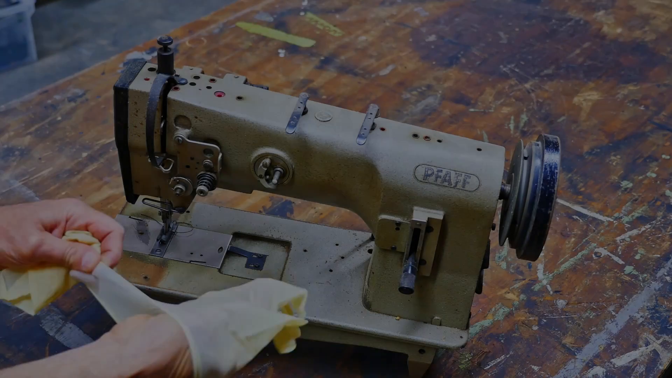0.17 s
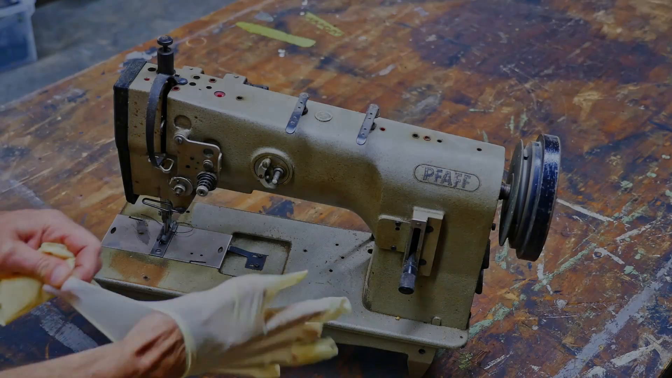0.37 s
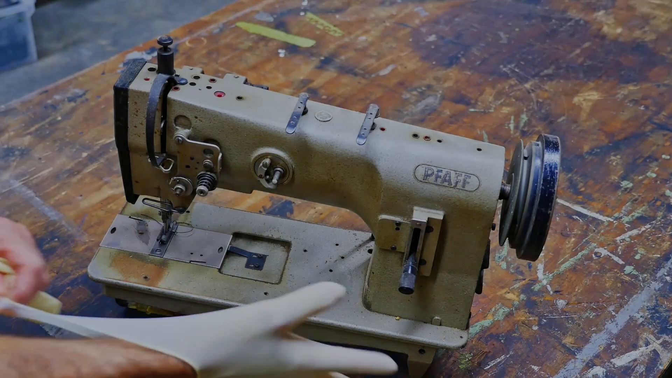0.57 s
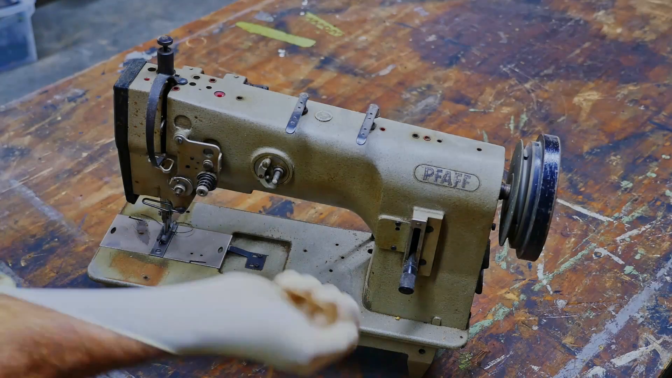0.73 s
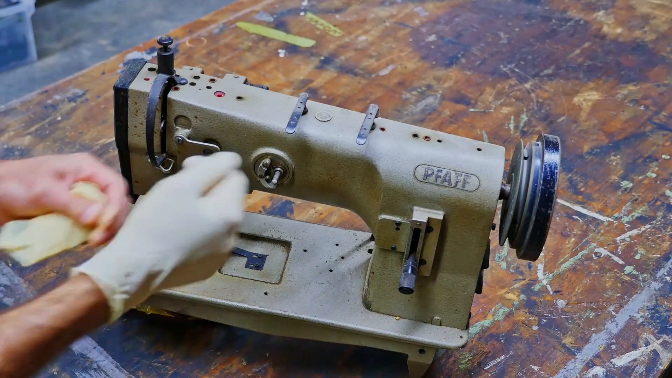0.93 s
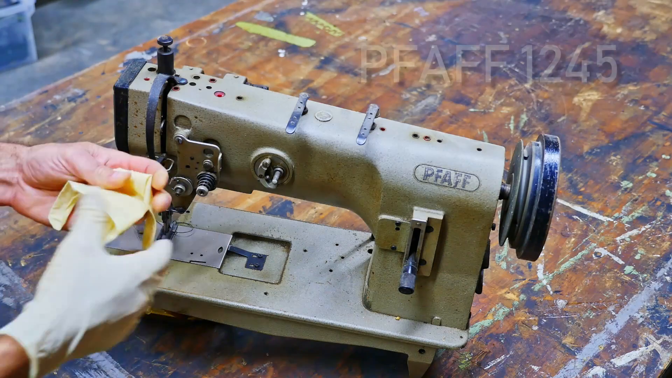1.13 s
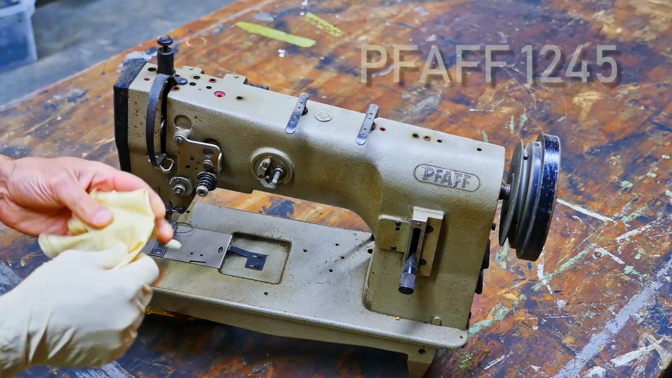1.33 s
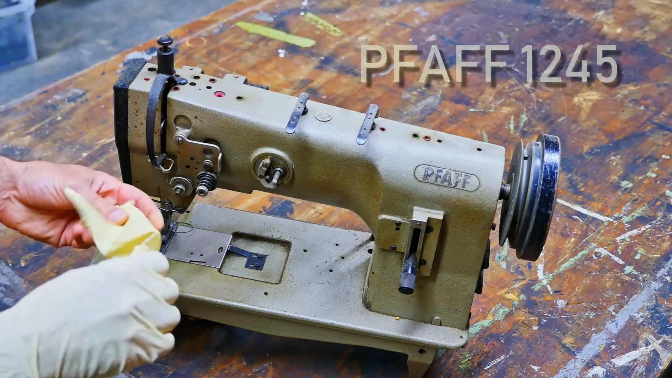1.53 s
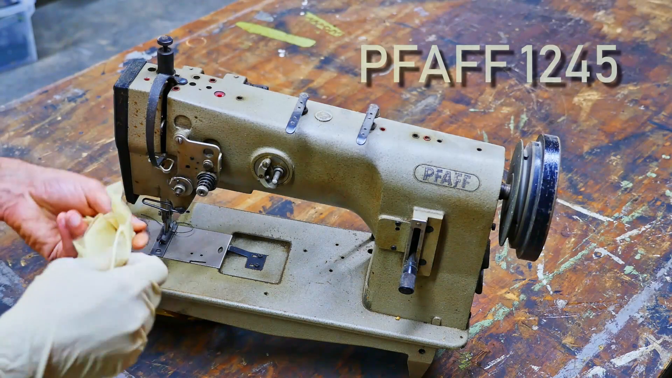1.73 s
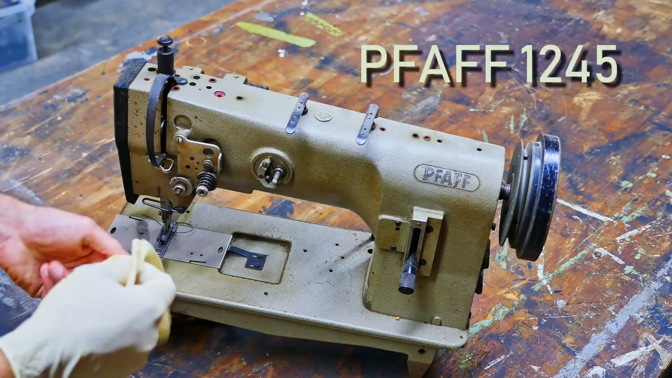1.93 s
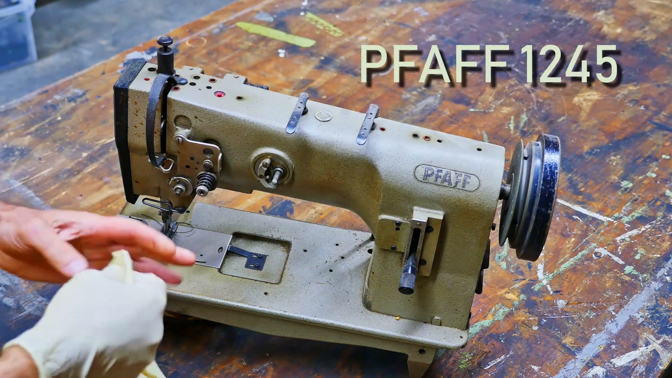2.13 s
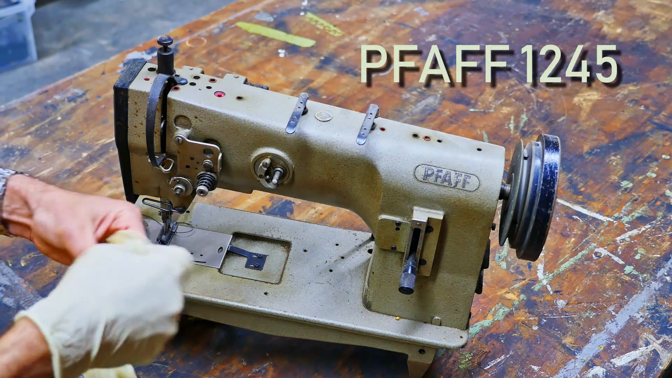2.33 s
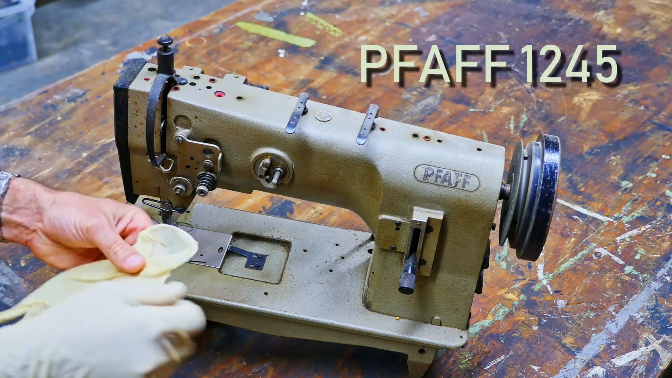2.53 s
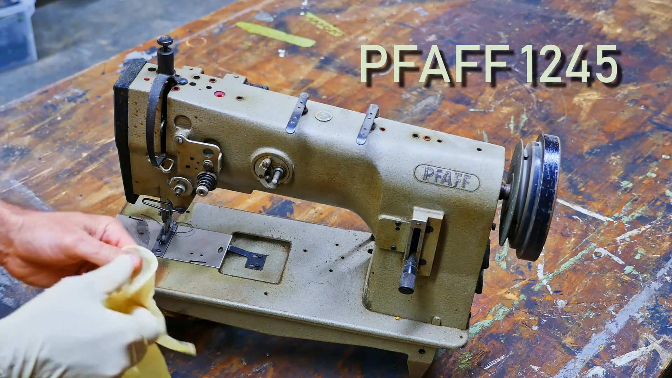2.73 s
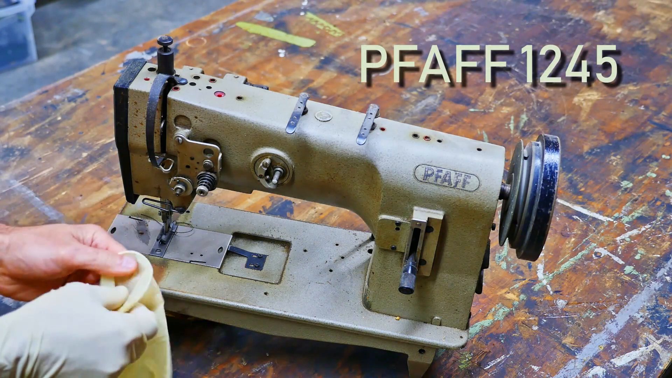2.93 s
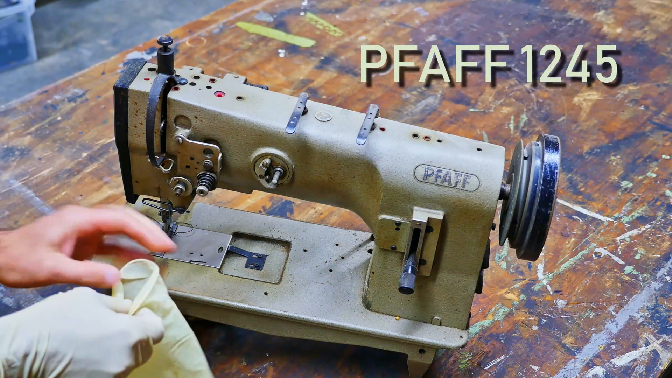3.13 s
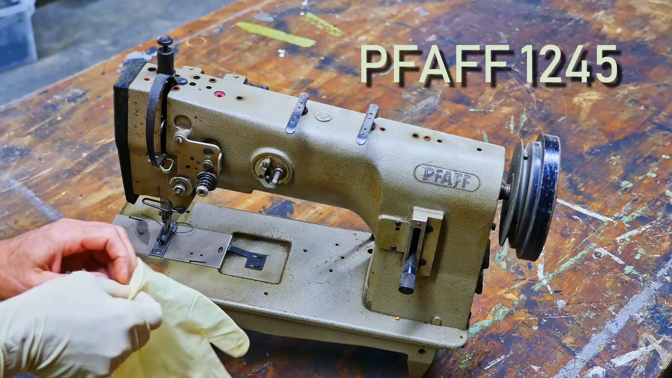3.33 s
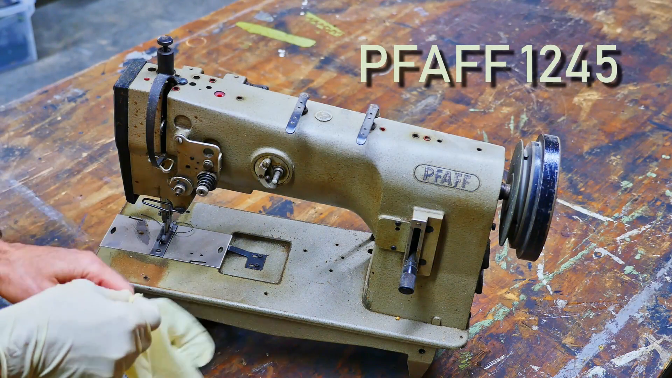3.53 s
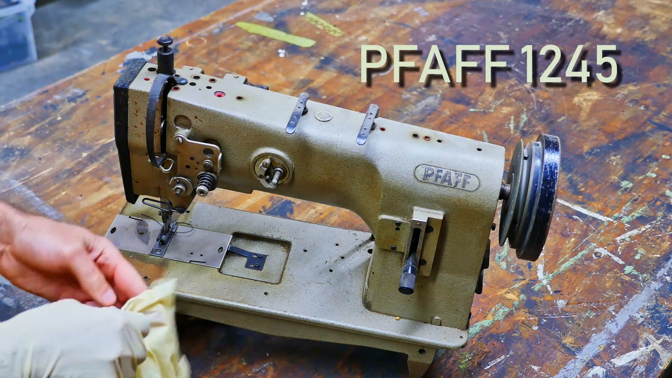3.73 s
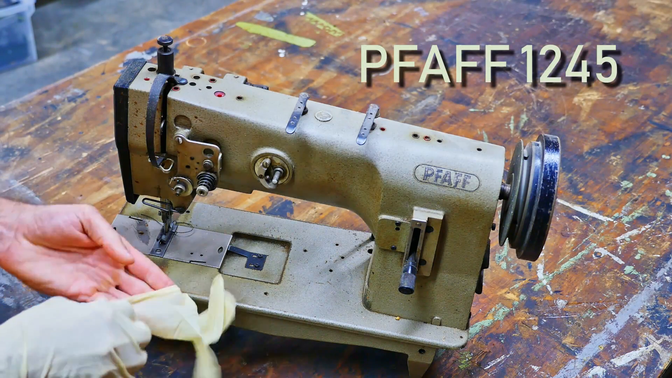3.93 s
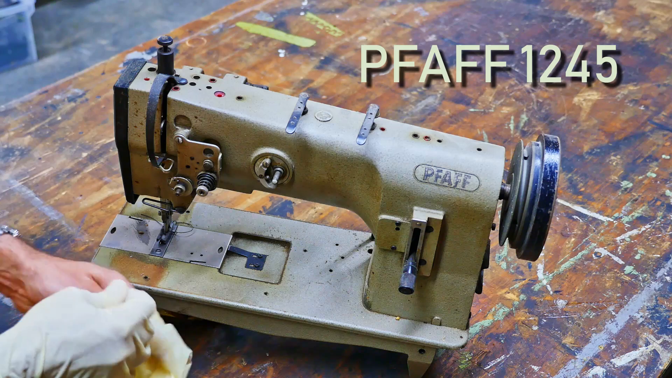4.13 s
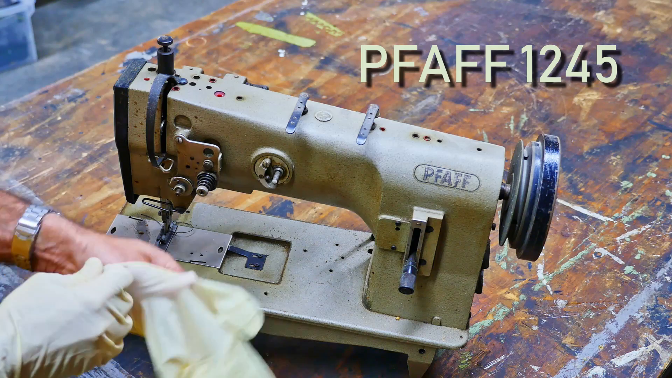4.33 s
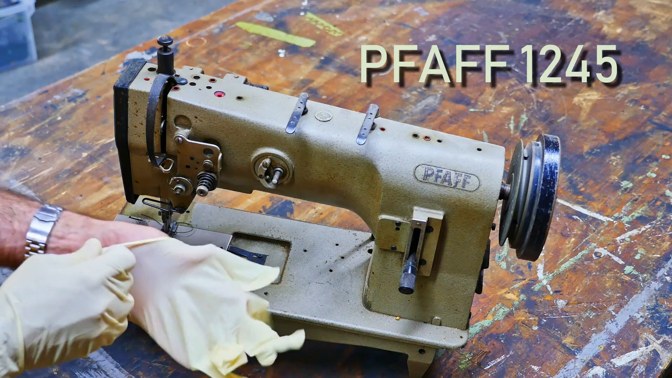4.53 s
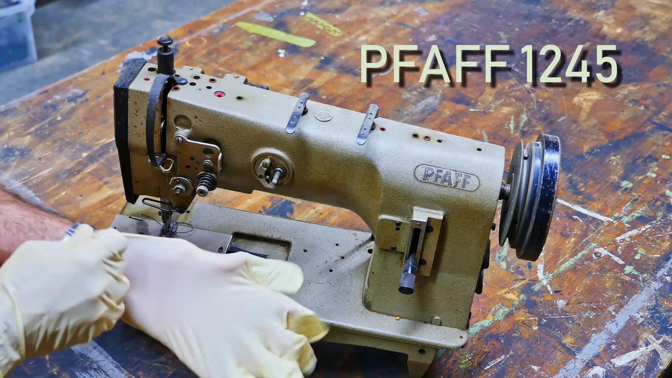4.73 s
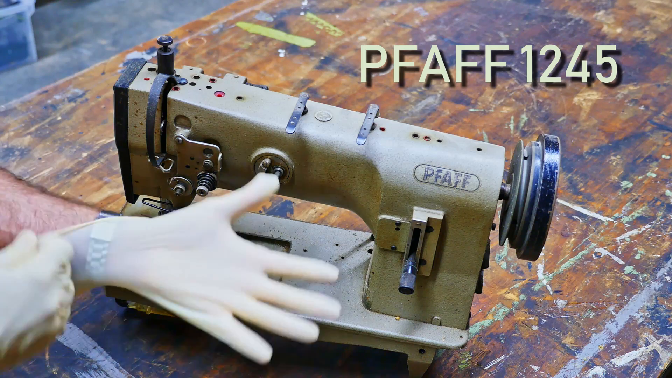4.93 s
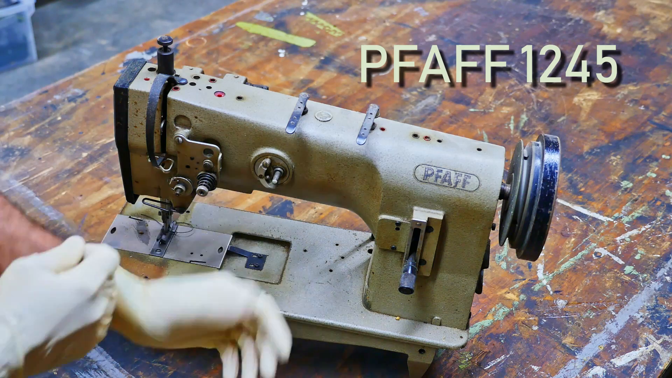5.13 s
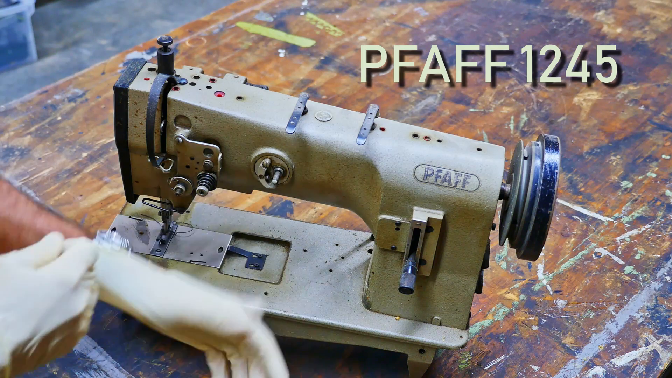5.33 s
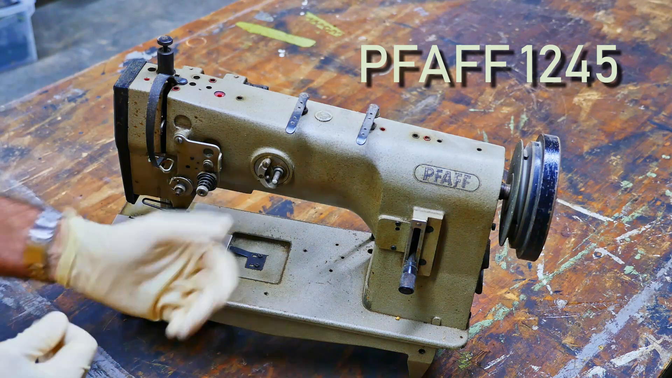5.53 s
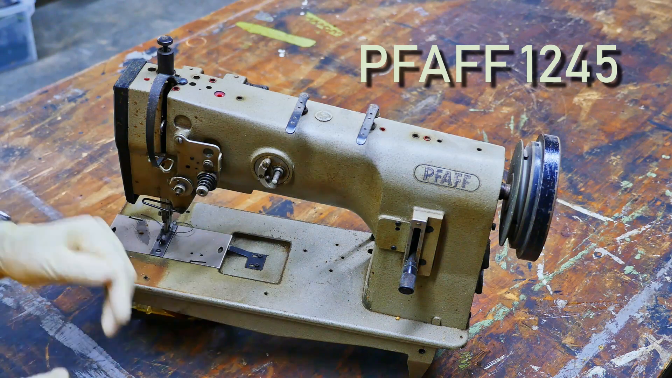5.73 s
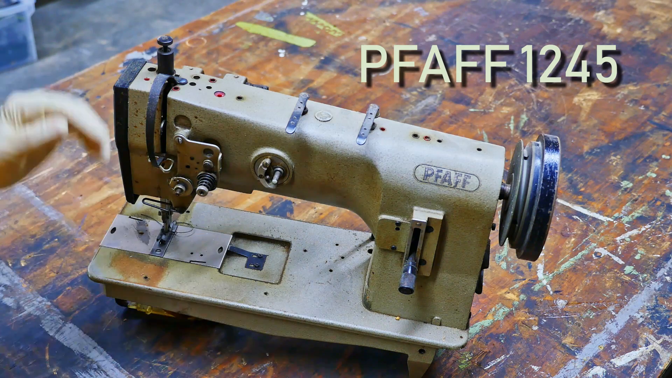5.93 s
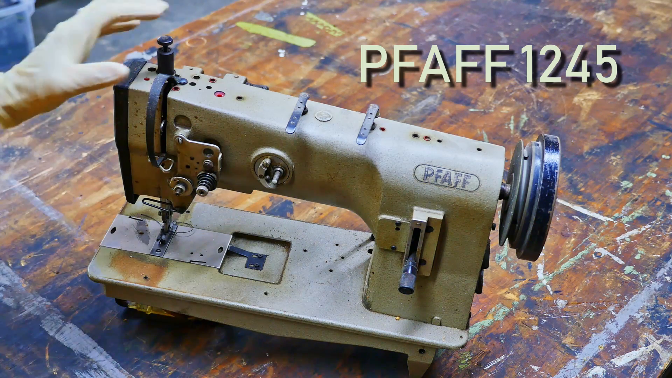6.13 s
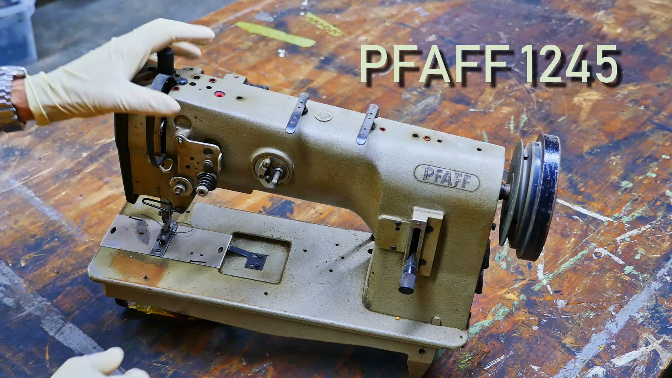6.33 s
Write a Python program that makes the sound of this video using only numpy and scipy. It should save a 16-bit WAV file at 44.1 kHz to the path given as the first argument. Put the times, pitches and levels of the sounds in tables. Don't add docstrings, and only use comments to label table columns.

```python
import sys
import numpy as np
from scipy import signal
from scipy.fft import rfft, irfft
from scipy.io import wavfile

SR = 44100
rng = np.random.default_rng(int(sys.argv[2]) if len(sys.argv) > 2 else 0)


def invert_db(x):
    u = np.asarray(x, float) / 20
    return 10 ** u


def output_pcm(signal):
    pcm = np.clip(np.atleast_2d(signal).T, -1, 1) * 32767
    wavfile.write(sys.argv[1], SR, np.round(pcm).astype(np.int16))


N = 284886


def rms_one(x):
    return x / np.sqrt(np.mean(x ** 2) + 1e-20)


def in_time(rows):
    s, *columns = np.transpose(rows)
    return [np.interp(np.arange(N) / SR, s, c) for c in columns]


def at_hz(points, hz):
    curve_hz, value = np.transpose(points)
    return np.interp(np.log(hz), np.log(curve_hz), value)


def drift(rate):
    knots = rng.standard_normal(N // 64 + 600)
    r = np.exp(-128 * np.pi * rate / SR)
    slow = signal.lfilter([1], [1, -2 * r, r * r], knots)[500:]
    return np.interp(np.arange(N) / 64, np.arange(len(slow)), rms_one(slow))


def resonate(x, hz, width_hz):
    r = np.exp(-np.pi * width_hz / SR)
    feed = np.array([1, 0, -1]) * (1 - r * r) / 2
    return signal.lfilter(feed, [1, -2 * r * np.cos(2 * np.pi * hz / SR), r * r], x)


def colour(x, spectrum):
    hz = np.maximum(np.fft.rfftfreq(x.shape[-1], 1 / SR), 1)
    (low_hz, low_db), (high_hz, high_db) = spectrum[0], spectrum[-1]
    ends = [(low_hz / 2, low_db - 40)] + list(spectrum) + [(high_hz * 2, high_db - 40)]
    return irfft(rfft(x) * invert_db(at_hz(ends, hz)), x.shape[-1])


def two_ports(mid, side, likeness):
    hz = np.maximum(np.fft.rfftfreq(N, 1 / SR), 1)
    alike = np.clip(at_hz(likeness, hz), -.95, .99)
    shared = rfft(mid) * np.sqrt((1 + alike) / 2)
    apart = rfft(side) * np.sqrt((1 - alike) / 2)
    return irfft(np.array([shared + apart, shared - apart]), N) * np.sqrt(2)


def workshop_air():
    # frequency in Hz, level in dB per Hz.
    air_spectrum = [(15, -69), (25, -15), (113, 4.5), (169, 2), (297, 4), (399, -7), (614, 4.5),
                    (970, -5.5), (1850, -9), (3630, -14), (5430, -24), (9810, -25), (14600, -25.5),
                    (15500, -66)]
    # frequency in Hz, width in Hz, level in dB rms.
    hum_tones = [
        (240, 12, -68),
        (297, 9, -63.5),
        (366, 15, -73),
    ]
    # frequency in Hz, left-right likeness from -1 to 1.
    air_likeness = [(60, -0.53), (240, 0.13), (950, -0.79), (3770, -0.46), (15000, -0.062)]
    air = rms_one(colour(rng.standard_normal((2, N)), air_spectrum))
    air *= invert_db(-59 + 0.7 * drift(1.0))
    hum = np.zeros((2, N))
    for hz, width_hz, db in hum_tones:
        tone = resonate(rng.standard_normal((2, N)), hz, width_hz)
        hum += invert_db(db) * rms_one(resonate(tone, hz, width_hz))
    return two_ports(*(air + hum), air_likeness)


def room(x):
    # frequency in Hz, time to fall 60 dB in seconds.
    decay_time = [(100, 1), (500, 0.55), (2200, 0.57), (5500, 0.47), (12000, 0.37)]
    t = np.arange(SR) / SR
    tail = np.zeros((2, SR))
    for low in 70 * 2. ** np.arange(8):
        octave = signal.butter(2, [low, 2 * low], "band", fs=SR, output="sos")
        band = signal.sosfilt(octave, rng.standard_normal((2, SR)))
        tail += band * invert_db(-60 * t / at_hz(decay_time, low * np.sqrt(2)))
    tail *= 1 - np.exp(-t / 0.00067)
    tail /= np.sqrt(np.sum(tail ** 2) / 2)
    return signal.fftconvolve(x[None], tail, axes=1)[:, :N]


def grains(per_s, spread_db, clump_db, clump_rate):
    born = rng.random(N) < per_s / SR
    uneven_db = spread_db * np.minimum(rng.exponential(1, N), 5)
    sizes = invert_db(uneven_db + clump_db * drift(clump_rate))
    return born * sizes * rng.standard_normal((2, N))


def strokes():
    # peak time in seconds, peak level in dB, length in seconds, then stretched ring
    # and trapped air flutter, both in dB over the hiss.
    stroke_rows = [(0.382, -57, 0.074, 13, 9), (0.495, -38, 0.11, -5.5, -4.5), (0.66, -34.5, 0.1, 2, -14),
                   (0.706, -36, 0.1, 3.5, -20), (0.808, -37, 0.042, -13, -10),
                   (0.884, -28.5, 0.031, -13, -13), (0.978, -38.5, .06, -29, -4.5),
                   (1.321, -48, 0.17, -5.5, -12.5), (1.776, -61, 0.43, -22, -14),
                   (2.379, -51.5, 0.16, -2.5, -22), (2.743, -55, 0.21, -21, -13),
                   (2.903, -55, 0.11, -23, -13), (3.066, -54.5, 0.22, -5, -6),
                   (3.368, -57.5, 0.15, -5, -19), (3.58, -51.5, 0.13, -8, -20), (3.83, -50, 0.21, -4, -12),
                   (4.895, -30.5, 0.13, -1.5, -12), (4.977, -47.5, 0.28, -23, -4),
                   (5.234, -35, 0.11, -11, -7.5), (5.411, -34, 0.1, -6.5, -9),
                   (5.515, -31, 0.14, -4.5, -10.5), (5.643, -43, 0.22, 3.5, 2),
                   (6.105, -58.5, 0.21, -26, -9), (6.46, -52.5, 0.3, -15, -19)]
    rise_db, fall_db = 33, 24.5
    t = np.arange(N) / SR
    power = np.zeros((3, N))
    for s, peak_db, length, stretch_db, air_db in stroke_rows:
        away = (t - s) / max(length, .02)
        swell = invert_db(2 * (peak_db - np.maximum(-rise_db * away, fall_db * away)))
        power += invert_db(2 * np.array([[0], [stretch_db], [air_db]])) * swell
    return power


def rustle():
    # time in seconds, sliding effort in dB, stretched ring in dB over it.
    handling = [(0, -44, -4.5), (0.18, -46.5, -2), (0.26, -51.5, 2), (0.6, -43.5, -5), (0.95, -45.5, -3.5),
                (1.08, -54.5, -3.5), (1.24, -56.5, -4), (1.6, -50.5, -9), (2.12, -62.5, -2),
                (2.6, -60, -4.5), (3.28, -64, -1.5), (3.5, -57, -4), (3.8, -54.5, -7), (4.15, -50.5, -2.5),
                (4.5, -48.5, -3), (4.76, -48.5, 1), (5.13, -51, -2), (5.88, -65, 1), ]
    # frequency in Hz, level in dB per Hz.
    hiss_spectrum = [(1650, -13.5), (2800, -12), (4030, -9.5), (5300, 1.5), (5610, 2), (6330, -6),
                     (7310, -2), (8140, -8), (9940, -11), (12800, -28.5), (14600, -35), (15500, -62)]
    film_spectrum = [(600, -12.5), (900, -7.5), (1300, -2.5), (1900, -3.5), (2500, -4.5), (3200, -8),
                     (4200, -9.5)]
    flutter_spectrum = [(35, -80), (60, -22), (134, -5.5), (188, -8), (226, 1), (355, 1.5), (570, -5.5),
                        (1100, -8.5), (1430, -87), (2420, -120)]
    effort_db, stretch_db = in_time(handling)
    ring_db = effort_db + stretch_db
    steady = invert_db(2 * np.array([effort_db, ring_db, ring_db - 6]))
    rest = [[0], [0], [invert_db(2 * -68)]]
    hiss_gain, ring_gain, flap_gain = np.sqrt(steady + strokes() + rest)
    hiss = rms_one(colour(grains(14000, 0.31, 1.06, 25), hiss_spectrum)) * hiss_gain
    ring = rms_one(colour(grains(5000, 0.44, 0.78, 46), film_spectrum)) * ring_gain
    flap = rms_one(colour(grains(1500, 2.0, 2.0, 18), flutter_spectrum)) * flap_gain
    return hiss + ring + flap


def squeaks():
    # time in seconds, slips per second in Hz, level in dB,
    # roughness from 0 to 1.
    glides = [
        [(.545, 1520, -52, 0.29), (.565, 1563, -32, 0.14), (.575, 1596, -25, 0.02), (.581, 1565, -45, 0.2),
         (.592, 1590, -45, 0.2), (.618, 1650, -46, 0.2), (.625, 1590, -70, .3)],
        [(4.888, 1317, -55, 0.14), (4.897, 1351, -21, .08), (4.908, 1390, -22.5, 0), (4.914, 1384, -27, .6),
         (4.945, 1362, -36, 0.55), (5.0, 1355, -64, 0.7)],
        [(4.915, 1500, -40, 0.49), (4.93, 1567, -28.5, 0.54), (4.945, 1604, -29, 0.4), (4.955, 1614, -31, 1),
         (4.985, 1635, -49, 0.9)],
        [(4.878, 1306, -28, 0.49), (4.886, 1255, -38, 0), (4.9, 1253, -29, 0), (4.93, 1240, -48, 0.3)],
        [(.576, 1640, -57, 0), (.588, 2040, -37, 0.2), (.596, 1750, -60, .2)],
        [(.14, 1310, -62, 0.4), (.175, 1320, -40, 0), (.2, 1320, -56, 0.1), (.245, 1305, -51, 0),
         (.29, 1320, -78, 0.2)],
    ]
    orders = [
        [-9.5, -2.5, -13, -4.5],
        [-14, -3, -9, 0.5],
        [-5.5, -1.5, -5, -12],
        [1, -31, -23, -25],
        [-2, -4, -20, -25],
        [-3.5, -15, -25, -30],
    ]
    out = np.zeros(N)
    t = np.arange(N) / SR
    for rows, orders_db in zip(glides, orders):
        hz, level_db, rough = in_time(rows)
        rough = np.clip(rough, 0, 1)
        slipping = (t > rows[0][0]) * (t < rows[-1][0])
        phase = 2 * np.pi * np.cumsum(hz * (1 + 0.0302 * rough * drift(224))) / SR
        for k, db in enumerate(orders_db, start=1):
            steady = np.sqrt(1 - rough) * np.sin(k * phase)
            noise_band = drift(260) * np.sin(k * phase) + drift(260) * np.cos(k * phase)
            smeared = np.sqrt(rough / 2) * noise_band
            out += invert_db(level_db + db) * (steady + smeared) * slipping
    return np.array([out, np.roll(out, 40) * .5])


def pops(rows, ring_q, crackle_width_hz, lead, bright_db, deep_db):
    span = 4096
    out = np.zeros((2, N + span))
    chance = rng.standard_normal((len(rows), 3, span))
    t = np.arange(span) / SR
    soft = signal.butter(3, [170, 8500], "band", fs=SR, output="sos")
    for (s, peak_db, hz, crackle_db, thump_db, ms), (one, other, uneven) in zip(rows, chance):
        ms = max(ms, .3)
        kick = np.array([one, other]) * np.exp(-t * 1000 / ms) * invert_db(6.1 * uneven)
        kick[0, 3] += lead / ms
        kick = signal.sosfilt(soft, kick)
        ring = resonate(resonate(kick, hz, hz / ring_q), hz, hz * 0.9)
        crackle = resonate(kick, 5550, crackle_width_hz)
        crackle = crackle - 0.069 * resonate(kick, 5400, 1400) + 0.097 * kick
        thump = resonate(resonate(kick, 240, 630), 470, 1200)
        at = round(s * SR)
        for part, db in [(ring, 0), (crackle, crackle_db + bright_db), (thump, thump_db + deep_db)]:
            level = part / np.abs(part).max(axis=1, keepdims=True)
            out[:, at:at + span] += invert_db(peak_db + db) * level * [[1], [.6]]
    return out[:, :N]


def tears():
    # start in seconds, peak in dB, ring in Hz, decay in ms.
    slips = [(0.468, -37.5, 2080, 7.3), (5.224, -32.5, 2480, 2.8), (0.981, -46, 3500, 1.6),
             (0.634, -23, 2330, 3.5), (0.64, -29, 1490, 4.2), (0.6528, -24.5, 2630, 7.9),
             (0.669, -23, 2290, 9.6), (0.681, -31, 2550, 17), (0.694, -31, 2220, 5.7),
             (0.707, -29, 2200, 14), (0.72, -26.5, 1850, 5.7), (0.872, -23, 2330, 2.8),
             (0.876, -23.5, 2180, 5.3), (2.382, -46, 1640, 19), (4.609, -58, 2940, 6)]
    rows = [(s, db, hz, 5.5, -20, ms) for s, db, hz, ms in slips]   # crackle, thump in dB re peak
    return pops(rows, ring_q=1.05, crackle_width_hz=900, lead=12, bright_db=4.5, deep_db=-1.0)


def folds():
    # start in seconds, peak in dB, ring in Hz, decay in ms.
    ticks = [(0.097, -32, 2200, 52), (0.152, -40, 2200, 8), (4.689, -37.5, 1580, 13),
             (4.719, -38, 1900, 7.4), (0.514, -25.5, 2250, 10), (0.611, -25.5, 2790, 5.6),
             (0.94, -32.5, 1600, 9.2), (0.98, -22, 3100, 3.9), (1.521, -41.5, 1750, 7.6),
             (1.928, -38, 1950, 7.1), (2.365, -44.5, 890, 3.8), (2.558, -48, 1520, 9.7),
             (3.049, -46.5, 2250, 13), (3.347, -35.5, 1870, 7), (3.443, -39.5, 1620, 6.1),
             (3.549, -38, 1850, 8.8), (3.606, -41.5, 2580, 11), (3.868, -36, 1760, 10),
             (3.999, -43, 2240, 8), (4.07, -40, 1350, 2.6), (4.099, -38, 3400, 17),
             (4.139, -37.5, 2290, 8.1), (4.185, -35, 1800, 12), (4.293, -38, 1280, 12),
             (4.343, -28.5, 1070, 12), (4.358, -37.5, 960, 42), (4.554, -38.5, 1260, 7.1),
             (4.807, -26.5, 1480, 4.1), (4.848, -37, 1830, 33), (4.88, -13, 2060, 7.8)]
    # start in seconds, peak in dB, ring in Hz, decay in ms,
    # crackle in dB re peak.
    puffs = [(0.274, -30.5, 1320, 13, -12.5), (0.365, -30.5, 1700, 8.7, -22), (3.817, -34.5, 1390, 13, -16),
             (0.474, -37.5, 715, 7.4, -20), (0.8, -31, 1650, 6, -19), (0.961, -34.5, 1680, 2.8, -21),
             (0.974, -38.5, 2300, 12, 5), (4.414, -41, 690, 14, -9.5), (4.492, -29.5, 1120, 16.5, -11),
             (4.783, -39, 2190, 18, -25), (4.979, -35, 2700, 12, -5), (5.225, -31, 2070, 12, -5),
             (5.248, -36, 2400, 24, -12), (5.532, -26.5, 1670, 11, -8)]
    rows = [(s, db, hz, -18.5, -20.5, ms) for s, db, hz, ms in ticks]   # crackle, thump in dB re peak
    rows += [(s, db, hz, crackle_db, -3.5, ms) for s, db, hz, ms, crackle_db in puffs]
    return pops(rows, ring_q=1.73, crackle_width_hz=690, lead=18.5, bright_db=7.0, deep_db=1.0)


def slaps():
    # start in seconds, peak in dB, crackle and thump in dB re peak, decay in ms.
    snaps = [(5.3911, -8.5, -35, -10.5, 6.7), (5.395, -10.5, 9, -7, 1.77), (5.398, -33.5, 21, -15, 24),
             (5.5, -14, -3, -12, 5.1), (5.5035, -22, 14.5, -34, 2.8), (5.5049, -27.5, -7, 5, 1.4),
             (5.5062, -21.5, 19, -27, 1.25), (5.5914, -33.5, -22, 9.5, 1.9),
             (5.5930, -0.5, -1.5, -19.5, 0.82), (5.5955, -16, 7, -16, 3.5), (5.6, -19.5, 3, -9.5, 6.1)]
    cuff_hz = 2070
    rows = [(s, db, cuff_hz, crackle_db, thump_db, ms) for s, db, crackle_db, thump_db, ms in snaps]
    return pops(rows, ring_q=1.8, crackle_width_hz=1800, lead=11.6, bright_db=0.5, deep_db=1.2)


def scene():
    # frequency in Hz, left-right likeness from -1 to 1.
    glove_likeness = [(60, 0.33), (180, 0.78), (550, 0.58), (1650, 0.78), (4970, 0.94), (15000, 0.4)]
    soft = signal.butter(4, 11800, fs=SR, output="sos")
    sharp = signal.sosfilt(soft, folds() + tears() + slaps() + squeaks())
    echo = invert_db(-11) * room(sharp[0])
    gloves = sharp + rustle() + echo
    return two_ports(*gloves, glove_likeness) + workshop_air()


def roll_off(x):
    return signal.sosfilt(signal.butter(12, 16500, fs=SR, output="sos"), x)


def record(dry):
    # frequency in Hz, width in Hz, lift in dB over the flat path.
    hz, width_hz, lift_db = (4860, 900, 0.94)
    # frequency in Hz, width in Hz.
    whine_filter = (7850, 110)
    lifted = dry + (invert_db(lift_db) - 1) * resonate(dry, hz, width_hz)
    notched = lifted - resonate(lifted, *whine_filter)
    return roll_off(np.clip(notched, -1, 1))


dry = scene()
out = record(dry)
output_pcm(out)
```